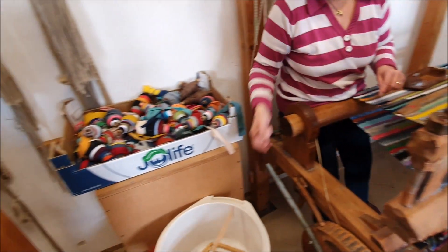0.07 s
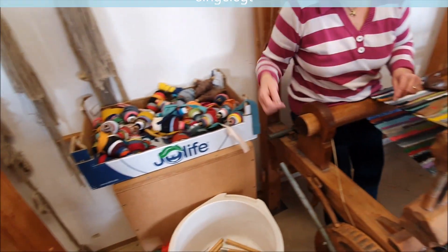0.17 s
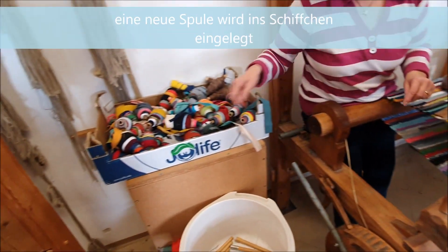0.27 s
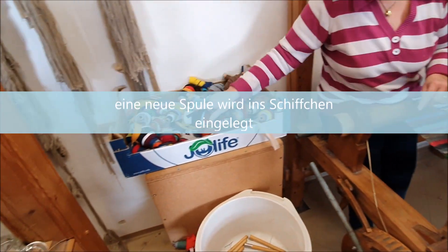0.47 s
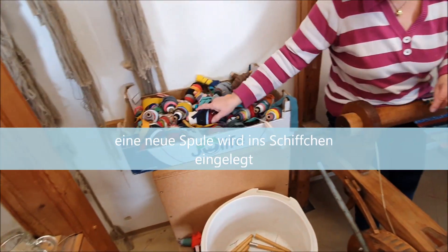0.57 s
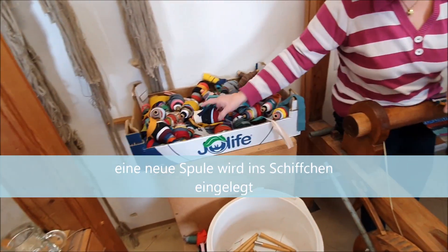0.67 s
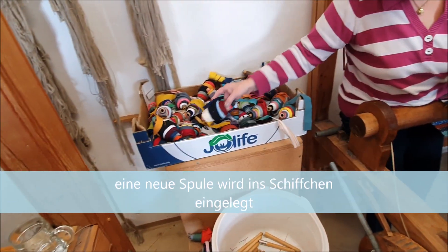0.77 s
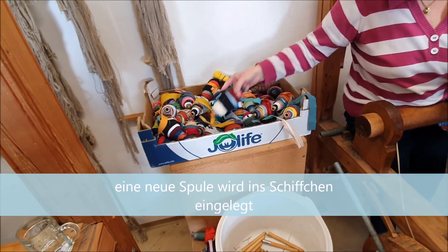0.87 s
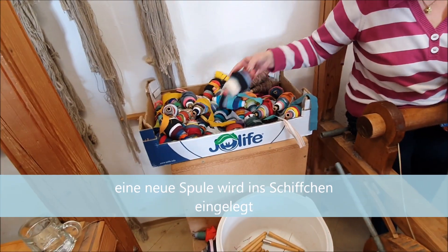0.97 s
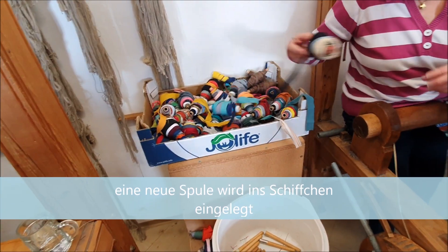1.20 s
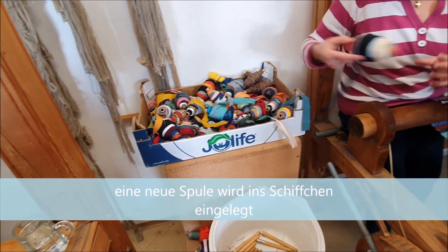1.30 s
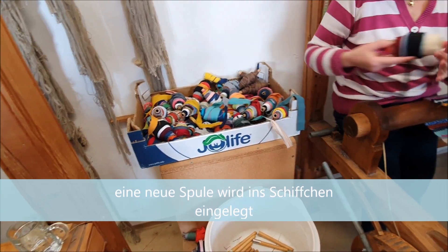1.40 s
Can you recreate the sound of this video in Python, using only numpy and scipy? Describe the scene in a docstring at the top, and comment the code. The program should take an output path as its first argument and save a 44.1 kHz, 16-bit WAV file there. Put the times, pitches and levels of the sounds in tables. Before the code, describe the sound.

Wooden bobbin dropping and bouncing in a plastic bucket, followed by light knocks of yarn spools.

```python
"""In a small room, an empty wooden bobbin drops into a plastic bucket of other bobbins, bounces and
settles. Each bounce is a clack of fading noise, plus ringing tones from the bucket wall and the bobbin.
Then a hand picks a full spool out of a cardboard box, and the spools knock together.
A sleeve rustles at the start, and soft thumps come from the bucket, the box and the floor.
Under it all lies a quiet hush, joined near the end by a faint, thin whine."""
import sys
import numpy as np
from scipy import signal
from scipy.fft import irfft
from scipy.io import wavfile
from scipy.ndimage import uniform_filter1d

SR = 44100
rng = np.random.default_rng(int(sys.argv[2]) if len(sys.argv) > 2 else 0)


def waveform_to_disk(signal):
    """Save audio, clipped to [-1, 1], as 16-bit WAV at the path in sys.argv[1]."""
    frames = np.transpose(np.atleast_2d(signal))
    scaled = np.clip(frames, -1, 1) * 32767
    samples = np.round(scaled).astype(np.int16)
    wavfile.write(sys.argv[1], SR, samples)


N = 63945

# How long the room echoes (a fade_s is the time to fall by 60 dB): pitch_hz, fade_s
ROOM_ECHO = [(300, 0.53), (800, 0.42), (2500, 0.27), (11000, 0.14)]
# How alike the left and right sides sound (1 is the same): pitch_hz, likeness
STEREO_LIKENESS = [(60, 0.97), (300, .9), (700, 0.8), (1400, 0.36), (6000, 0.031)]
# How much louder the left side is than the right: pitch_hz, difference_db
LEFT_BOOST = [(60, 0.5), (2800, 4.5), (5500, 7), (9000, -1.5), (14000, 9)]
# The tone of the room's hush: pitch_hz, relative_db
HUSH_TONE = [(25, -33), (60, -7), (200, -8), (450, -24.5), (2800, -24), (6400, -42), (8000, -36),
             (16000, -40)]
# The tone of the rustling sleeve: pitch_hz, relative_db
SLEEVE_TONE = [(100, -8), (170, 7.5), (300, -23), (700, -8.5), (4000, -7), (6200, -5), (8000, -19)]
# How loud the sleeve is over time: time_s, level_db
SLEEVE_LEVELS = [(0, -43.5), (.13, -45), (.16, -55.5), (.8, -60.5), (1.14, -54.5), (1.3, -58), (1.45, -64)]
# Soft thumps and the low hum they leave: start_s, pitch_hz, level_db, fade_s
LOW_THUMPS = [(0.251, 63, -42, 2.7), (0.333, 153.3, -17, 0.11), (0.345, 134.4, -30, 0.55),
              (0.388, 85.4, -38, 0.78), (0.541, 255.3, -19, 0.18), (.735, 164.8, -38.5, 0.35),
              (0.823, 188, -40, 0.12), (1.108, 88.4, -41, 0.89), (1.174, 58, -38.5, 0.48),
              (1.416, 175.6, -37, 0.22)]
# Light touches on nearby bobbins and spools: start_s, pitch_hz, level_db, fade_s
LIGHT_TOUCHES = [(.241, 3683, -25.5, 0.38), (0.4627, 910, -26, 0.054), (.5085, 745, -16.5, 0.058),
                 (0.5287, 2770, -21, 0.094), (1.136, 2480, -48, 0.16)]
# Where the five parts of a hit lie, low to high (thud, knock, clack, snap, tick): pitch_hz
HIT_BANDS_HZ = [300, 850, 2400, 5200, 11000]
# Spools knocking in the box, each knock with a note of its own:
# start_s, thud_db, knock_db, clack_db, snap_db, tick_db, core_db, note_hz, note_db, note_fade_s
SPOOL_KNOCKS = [(.168, -57, -42.5, -55, -44, -68, -79, 1014, -42, 0.052),
                (0.7905, -52.5, -34.5, -45.5, -45, -68, -50.5, 3180, -34.5, 0.051),
                (0.9218, -48, -34, -38, -45, -46.5, -48.5, 334, -42.5, 0.34),
                (0.996, -51, -31.5, -47, -50, -67, -80, 750, -27, 0.053),
                (1.033, -38, -30, -36.5, -30.5, -36, -43.5, 3576, -35.5, 0.27),
                (1.176, -30.5, -27.5, -31, -25.5, -34, -40, 1244, -26, 0.13)]
# The tone of a hit in the box: pitch_hz, boost_db
BOX_HIT_TONE = [(170, -19), (320, 2.5), (500, -4), (1250, 2), (1800, 1.5), (3300, 7.5), (4900, -4),
                (6400, 1.5), (7800, -14), (15000, -9)]
# The tones a spool's core rings with: pitch_hz, relative_db, fade_s
CORE_TONES = [(1080, 8.7, 0.17), (1562, 1, 0.067), (2490, 2.3, 0.18)]
# The bobbin's bounces in the bucket:
# start_s, thud_db, knock_db, clack_db, snap_db, tick_db, wall_db, bobbin_db
BOUNCES = [(0.2356, -43, -56, -36, -26, -47, -60, -53), (0.2401, -41, -22, -14, -12, -19.5, -25, -43),
           (.2520, -18.5, -13, -14.5, -25, -21, -21.5, -34),
           (0.3225, -41, -31, -18.5, -23.5, -40, -72, -23.5), (0.33, -20.5, -26, -48, -21, -35, -38, -16),
           (0.4641, -23, -24.5, -20, -29.5, -37, -39, -22), (0.489, -37, -27, -40, -28.5, -36, -44, -18.5),
           (0.507, -43, -17, -20, -29.5, -36, -49, -49), (0.5293, -60, -47, -19, -28, -21, -59, -50),
           (0.541, -20.5, -15, -12.5, -17.5, -11, -36, -15.5),
           (.5550, -20.5, -16.5, -19.5, -24.5, -55, -32.5, -48),
           (0.5756, -35, -22, -20, -27, -25.5, -29.5, -42),
           (.6160, -27.5, -24.5, -18, -27.5, -32, -51, -44),
           (0.6226, -19, -32, -34.5, -20, -22.5, -45, -10), (0.7096, -54, -43, -49.5, -39.5, -52, -75, -54)]
# The heap of bobbins as it starts to rattle: thud_db, knock_db, clack_db, snap_db, tick_db
HEAP_LEVELS = [-30.5, -23.5, -20.5, -22, -29]
# The tone of a hit in the bucket: pitch_hz, boost_db
BUCKET_HIT_TONE = [(60, -10.5), (180, -24), (270, -5), (480, -7.5), (800, -0.5), (1700, -1), (2800, 2.5),
                   (4200, 0), (6400, 4), (7800, -10), (11500, -4.5), (15000, -6)]
# The tones the plastic bucket wall rings with: pitch_hz, relative_db, fade_s
WALL_TONES = [(317, -7, 0.55), (398.2, -10, 0.46), (662.7, -5, 0.42), (718.8, -2.5, 0.47), (897.8, 3, 0.24),
              (1062, 2.5, 0.19), (1184, -7, 0.38), (1486, -9, 0.33), (2008, -9, 0.48)]
# The tones the empty wooden bobbin rings with: pitch_hz, relative_db, fade_s
BOBBIN_TONES = [(2508, 8.5, 0.042), (2518, -21, 0.34), (2780, -18, 0.014)]


def gain(db):
    """Turns decibels into a number to multiply a sound by."""
    return 10 ** (np.asarray(db) / 20)


def normalize(sound):
    """Scales a sound to an average power of 1."""
    return sound / np.sqrt(np.mean(sound ** 2) + 1e-20)


def look_up(table, hz):
    """Reads a table at any pitch, sliding between its rows on a scale of octaves."""
    pitches, values = np.transpose(table)
    return np.interp(np.log(hz + 1), np.log(pitches + 1), values)


def add(mix, start_s, sound):
    """Adds a stereo sound to the mix at the given time."""
    part = mix[:, round(start_s * SR):][:, :sound.shape[1]]
    part += sound[:, :part.shape[1]]


def side_gains(hz):
    """Left and right gains: most pitches are louder on the left."""
    return gain(np.array([[.5], [-.5]]) * look_up(LEFT_BOOST, hz))


def side_angle(hz):
    """How far out of step left and right are, in radians: more so for high pitches."""
    return np.arccos(np.clip(look_up(STEREO_LIKENESS, hz), -1, 1))


def noise_spectra(size):
    """Pitches and their random left and right spectra, alike in the bass and unrelated in the treble."""
    hz = np.fft.rfftfreq(size, 1 / SR)
    common, apart = np.exp(2j * np.pi * rng.random((2, len(hz))))
    angle = side_angle(hz) / 2
    middle, side = common * np.cos(angle), apart * np.sin(angle)
    return hz, np.array([middle + side, middle - side]) * side_gains(hz)


def steady_noise(tone):
    """Even stereo noise with the given tone."""
    hz, spectra = noise_spectra(N)
    return normalize(irfft(spectra * gain(look_up(tone, hz)), N))


def random_ripple(depth_db):
    """Small peaks and dips from an object's many crowded tones, as rows of pitch_hz, boost_db."""
    hz = np.geomspace(400, 16000, 170)
    return np.column_stack([hz, depth_db * np.sin(np.cumsum(rng.uniform(1, np.pi, len(hz))))])


def hit(levels_db, tone, ripple, attack_s, *, fade_at_1khz_s, tick_fade_s, damping,
        echo_db, tick_echo_db, echo_rise_s, chatter_db):
    """A struck thing rings with so many short tones that they blur into noise; the room echoes it."""
    size = 2 ** 15
    t = np.arange(size) / SR
    hz, spectra = noise_spectra(size)
    shape_db = look_up(list(zip(HIT_BANDS_HZ, levels_db)), hz) + look_up(tone, hz) + look_up(ripple, hz)
    even_octaves = np.sqrt(size * SR / 2 / (hz + 20))  # gives each octave about the same power
    spectra = spectra * gain(shape_db) * even_octaves
    jitter = normalize(uniform_filter1d(rng.standard_normal(size), size=24))
    chatter = normalize(gain(chatter_db * np.tanh(jitter)))  # the contact chatters, roughening the highs
    out = np.zeros((2, size))
    for octave_hz in 125 * 2 ** np.arange(8):
        band = np.maximum(1 - abs(np.log2((hz + 1) / octave_hz)), 0)
        if octave_hz > 8000:  # the top octave is a short tick
            fade_s, room_db = tick_fade_s, tick_echo_db
        else:  # damping makes higher octaves die sooner
            fade_s, room_db = fade_at_1khz_s * (octave_hz / 1000) ** -damping, echo_db
        direct = gain(-60 * t / fade_s)
        echo = gain(room_db - 60 * t / look_up(ROOM_ECHO, octave_hz)) * (1 - np.exp(-t / echo_rise_s))
        out += irfft(spectra * band) * np.hypot(direct, echo) * (chatter if octave_hz > 1000 else 1)
    return out * (1 - np.exp(-t / attack_s))


def ring(tones, level_db, attack_s):
    """Pure tones that fade for up to a second and waver as the room's echoes mix in."""
    echo_share, wavers_per_s = 0.44, 130
    out = np.zeros((2, SR))
    for hz, relative_db, fade_s in tones:
        t = np.arange(int(min(fade_s, 1) * SR)) / SR
        side_shift = np.array([[.5], [-.5]]) * side_angle(hz) * rng.choice([-1, 1])
        echoes = rng.standard_normal((wavers_per_s + 1, 2)) @ np.array([1, 1j])  # random size and phase
        waver = 1 + echo_share * np.interp(t * wavers_per_s, np.arange(len(echoes)), echoes)
        loudness = gain(level_db + relative_db - 60 * t / fade_s) * (1 - np.exp(-t / attack_s))
        wave = np.exp(2j * np.pi * (hz * t + rng.random()) + 1j * side_shift)
        add(out, 0, side_gains(hz) * (loudness * waver * wave).imag)
    return out


def close_tones(hz, fade_s):
    """A core that is not quite round has three close tones that throb together; the top one dies first."""
    spread, outer_db = 0.043, -6
    return [(hz, 0, fade_s),
            (hz * (1 - spread), outer_db, fade_s),
            (hz * (1 + spread), outer_db, fade_s / 2)]


def room_hush():
    """The quiet, steady noise of the room."""
    return gain(-55) * steady_noise(HUSH_TONE)


def faint_whine():
    """One thin tone that fades in near the end."""
    pitch_hz, level_db, start_s, rise_s = 930, -59.5, 1.3, 0.053
    t = np.arange(N) / SR
    fade_in = np.clip((t - start_s) / rise_s, 0, 1)
    return gain(level_db) * fade_in * np.sin(2 * np.pi * pitch_hz * t)


def sleeve_rustle():
    """Moving cloth makes a soft noise, loudest at the start."""
    level_db = np.interp(np.arange(N) / SR, *np.transpose(SLEEVE_LEVELS))
    return steady_noise(SLEEVE_TONE) * gain(level_db)


def soft_thumps():
    """The bucket, box and floor hum with one low tone for each thump."""
    out = np.zeros((2, N))
    for start_s, hz, level_db, fade_s in LOW_THUMPS:
        add(out, start_s, ring([(hz, 0, fade_s)], level_db, attack_s=0.0031))
    return out


def jostled_neighbours():
    """Light touches make a nearby bobbin or spool ring without a clack."""
    out = np.zeros((2, N))
    for start_s, hz, level_db, fade_s in LIGHT_TOUCHES:
        add(out, start_s, ring(close_tones(hz, fade_s), level_db, attack_s=0.0017))
    return out


def knocking_spools():
    """Spools full of yarn knock together in the box, ringing a core and a different note each time."""
    out = np.zeros((2, N))
    ripple = random_ripple(depth_db=0.5)
    for start_s, thud, knock, clack, snap, tick, core_db, note_hz, note_db, note_fade_s in SPOOL_KNOCKS:
        attack_s = min(.00002 / gain(snap), .005)  # light knocks start softly
        contact = hit([thud, knock, clack, snap, tick], BOX_HIT_TONE, ripple, attack_s,
                      fade_at_1khz_s=0.14, tick_fade_s=0.027, damping=0.48,
                      echo_db=-7.5, tick_echo_db=-1, echo_rise_s=0.053, chatter_db=6.5)
        core = ring(CORE_TONES, core_db, attack_s)
        note = ring(close_tones(note_hz, note_fade_s), note_db, attack_s)
        add(out, start_s, contact)
        add(out, start_s, core + note)
    return out


def wood_clack(levels_db, ripple, attack_s):
    """One short hit of wood in the bucket."""
    return hit(levels_db, BUCKET_HIT_TONE, ripple, attack_s,
               fade_at_1khz_s=0.069, tick_fade_s=0.023, damping=0.26,
               echo_db=-9, tick_echo_db=-20, echo_rise_s=0.0065, chatter_db=3.5)


def dropped_bobbin():
    """Each bounce clacks and rings the bucket wall and the bobbin; the landing rattles the heap."""
    out = np.zeros((2, N))
    ripple = random_ripple(depth_db=4.0)
    for start_s, thud, knock, clack, snap, tick, wall_db, bobbin_db in BOUNCES:
        attack_s = min(.00009 / gain(snap), .004)  # weak hits scuff and build up more slowly
        add(out, start_s, wood_clack([thud, knock, clack, snap, tick], ripple, attack_s))
        wall = ring(WALL_TONES, wall_db, attack_s=0.0039)
        bobbin = ring(BOBBIN_TONES, bobbin_db, attack_s=0.0058)
        add(out, start_s, wall + bobbin)
    # The heap rattles: ten quick, uneven clacks that die away.
    rattle_start_s, gap_s, fall_db_per_s = .2435, .0065, 119
    for delay_s in gap_s * (np.arange(10) + .5 * rng.random(10)):
        levels_db = np.array(HEAP_LEVELS) - fall_db_per_s * delay_s
        add(out, rattle_start_s + delay_s, wood_clack(levels_db, ripple, attack_s=1 / SR))
    return out


def scene():
    """All the sounds added together."""
    impacts = dropped_bobbin() + knocking_spools() + jostled_neighbours() + soft_thumps()
    return impacts + sleeve_rustle() + faint_whine() + room_hush()


def record(dry):
    """Rounds off the loudest peaks, then cuts the very highest treble."""
    ceiling, cutoff_hz = .9, 16200
    rounded = dry / (1 + (dry / ceiling) ** 6) ** (1 / 6)
    low_pass = signal.firwin(255, cutoff_hz, window=("kaiser", 9), fs=SR)
    return signal.oaconvolve(rounded, low_pass[None], "same")


dry = scene()
out = record(dry)
waveform_to_disk(out)
```